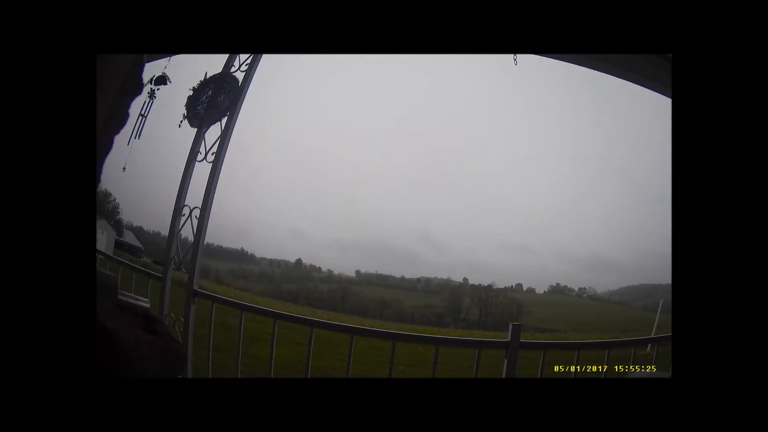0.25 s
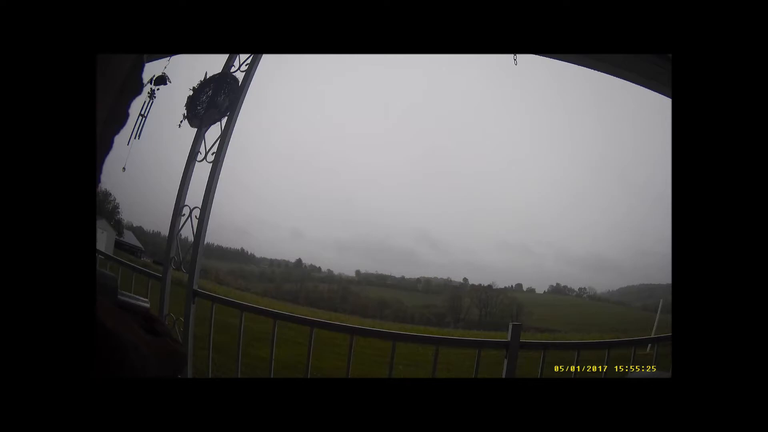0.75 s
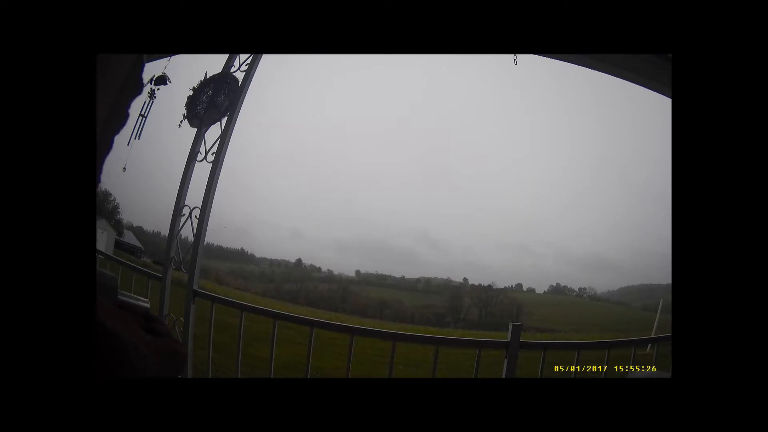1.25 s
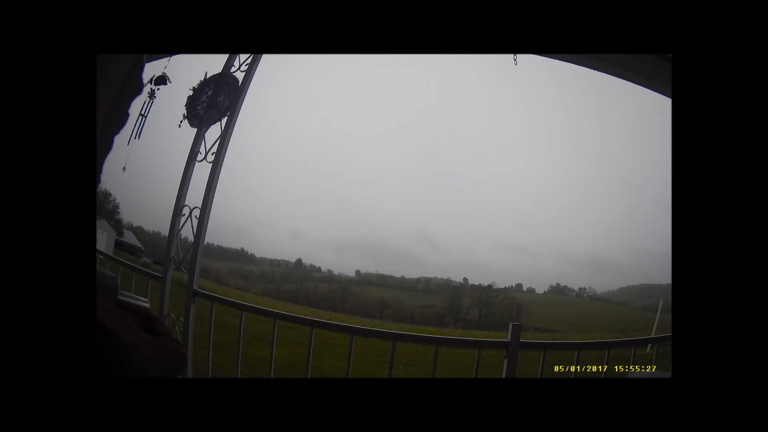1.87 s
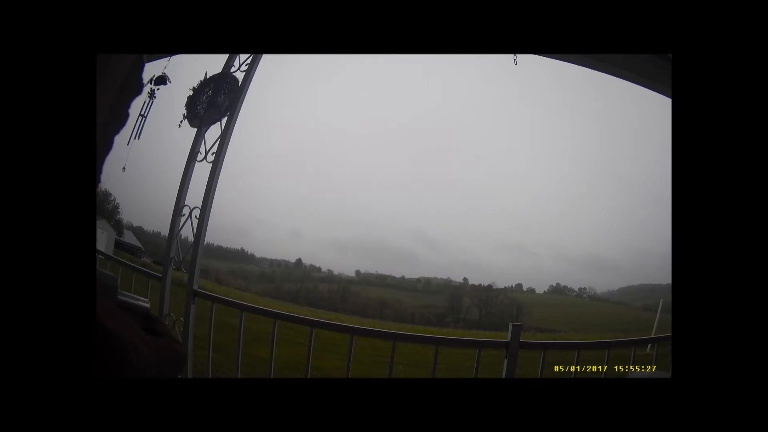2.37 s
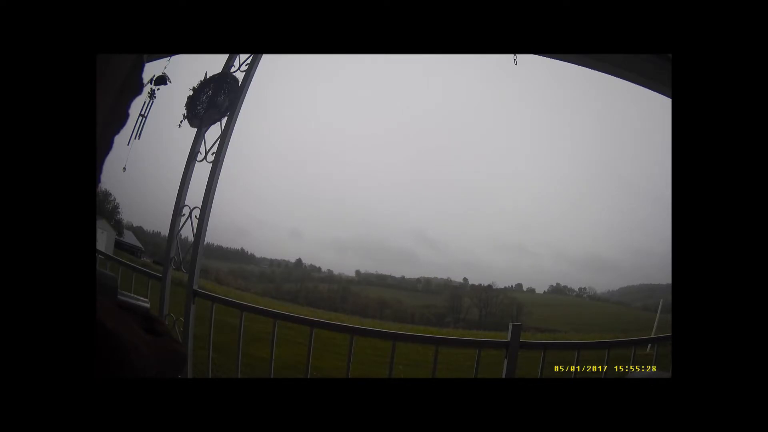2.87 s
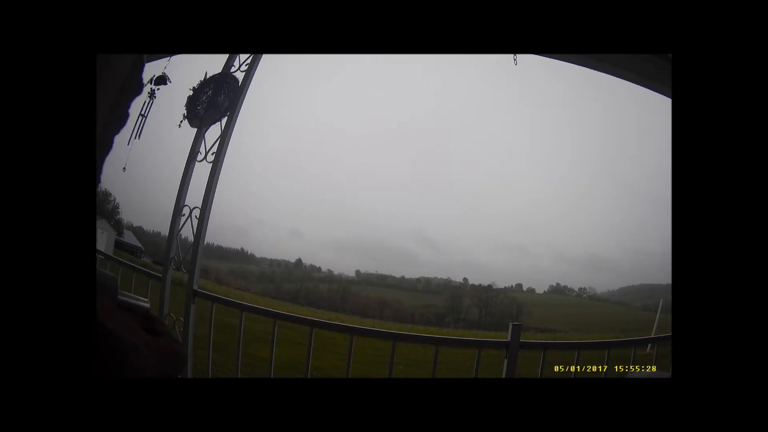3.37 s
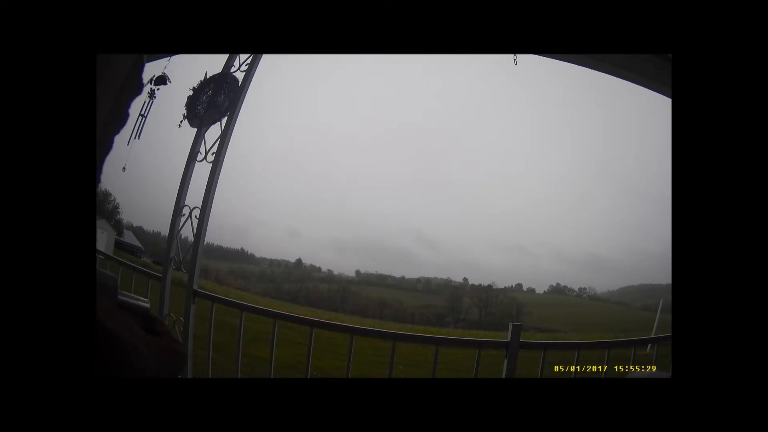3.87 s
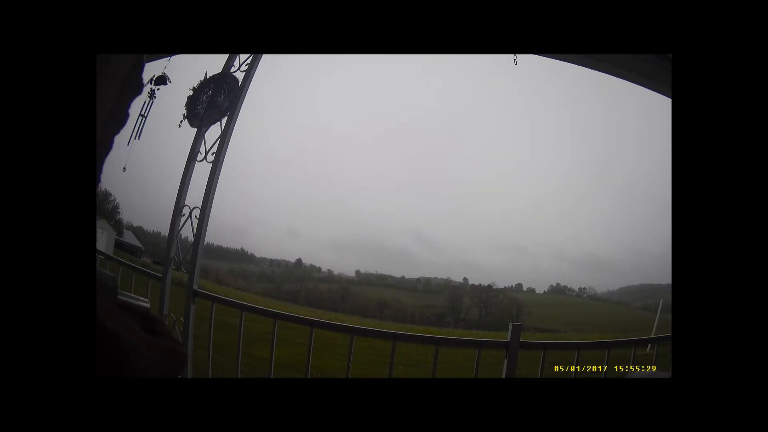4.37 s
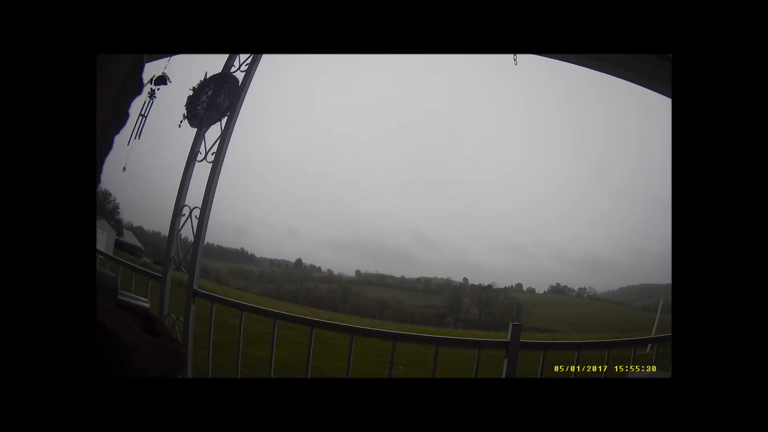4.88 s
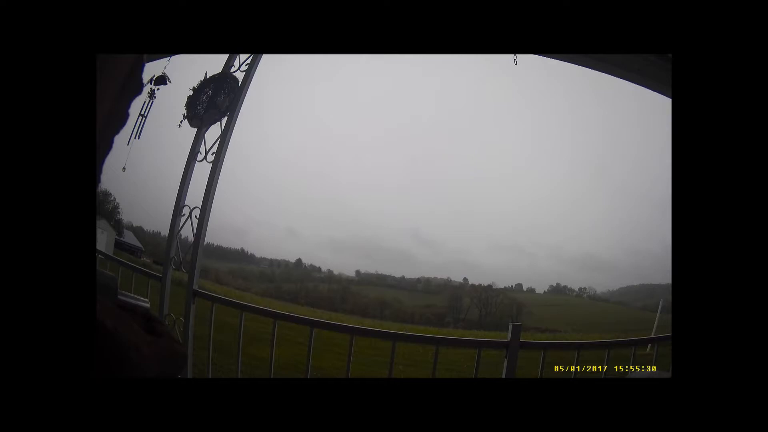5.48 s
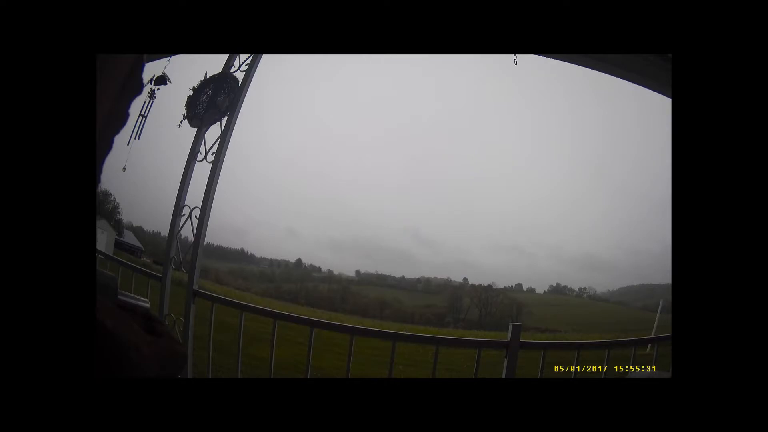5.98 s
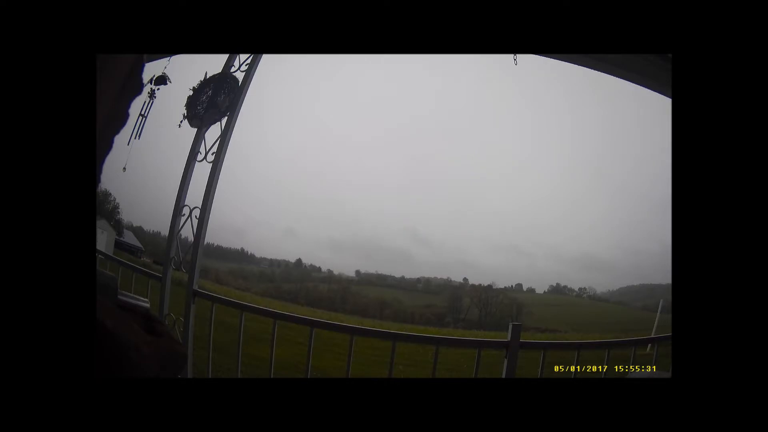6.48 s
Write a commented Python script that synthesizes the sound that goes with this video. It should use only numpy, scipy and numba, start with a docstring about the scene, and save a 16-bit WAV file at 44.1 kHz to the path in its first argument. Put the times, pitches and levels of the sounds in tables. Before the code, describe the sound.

Quiet drizzle with plinking drops is suddenly split by very loud nearby thunder, whose ragged claps crackle and boom on over the rain.

```python
"""Light rain, with plinking drops and a faint whine from the camera; then a thin snap and close thunder.
Heard from a country porch: far drops are shaped noise, near drops are splashes and brief rings.
Each kink of the lightning channel sends a small shock: they make a crackling roll, and claps where a
whole stretch arrives at once. The porch rings with them, and a bird whistles thinly near the end.
The camera's gain control ducks under the thunder and its input flattens the loudest peaks."""
import sys
import numpy as np
from scipy import signal
from scipy.fft import rfft, irfft
from scipy.io import wavfile
from scipy.ndimage import uniform_filter1d
from numba import njit

SR = 44100
rng = np.random.default_rng(int(sys.argv[2]) if len(sys.argv) > 2 else 0)


def to_wav(s):
    """Save 16-bit WAV."""
    ch = np.atleast_2d(s).T  # columns
    pcm = np.round(np.clip(ch, -1, 1) * 32767)  # PCM
    wavfile.write(sys.argv[1], SR, pcm.astype(np.int16))


N = 297234
TIME = np.arange(N) / SR
TAPS = 8192  # length of every filter response, in samples
FREQ = np.maximum(np.arange(TAPS // 2 + 1) * SR / TAPS, 1)  # Hz


def amp(db):
    """Decibels to gain."""
    return 10 ** (np.asarray(db) / 20)


def unit(x):
    """Scale to rms 1."""
    return x / np.sqrt(np.mean(x ** 2))


def line(points, at=TIME):
    """Straight lines through (seconds, value) points."""
    return np.interp(at, *np.transpose(points))


def colour(points):
    """Gain at every frequency from (Hz, dB) points, joined along log frequency."""
    hz, db = np.transpose(points)
    return amp(np.interp(np.log(FREQ), np.log(hz), db))


def below(hz, order=10):
    """Gain of a low-pass, steep by default."""
    return 1 / np.sqrt(1 + (FREQ / hz) ** order)


def above(hz, order=10):
    """Gain of a high-pass, steep by default."""
    return 1 / np.sqrt(1 + (hz / FREQ) ** order)


def response(gain):
    """Causal (minimum-phase) impulse response with this gain at each frequency."""
    cepstrum = irfft(np.log(gain + 1e-6))
    cepstrum[1:TAPS // 2] *= 2
    cepstrum[TAPS // 2 + 1:] = 0
    return irfft(np.exp(rfft(cepstrum)))


def through(x, h):
    """Filter by a response scaled to unit energy."""
    return signal.fftconvolve(x, h / np.linalg.norm(h))[:N]


def add(out, s, sound):
    """Mix a sound in at a time in seconds."""
    i = int(s * SR)
    out[i:i + len(sound)] += sound[:N - i]


def walk(rate):
    """Smooth random drift with a spread near 1, heading for a new value `rate` times a second."""
    k = int(SR / rate)
    steps = np.repeat(rng.standard_normal(N // k + 1), k)
    return 1.2 * uniform_filter1d(steps, k)[:N]


def clicks(rate, spread_db):
    """Randomly timed impulses, `rate` a second on average, of uneven size and either sign."""
    chance, size = rng.random(N), rng.standard_normal(N)
    struck = chance < rate / SR
    return unit(struck * amp(spread_db * size) * rng.choice([-1, 1], N))


def porch(wet_db, t60):
    """The direct sound, then dense reflections from roof, wall and deck that die away over t60 seconds."""
    t = TIME[:TAPS]
    tail = rng.standard_normal(TAPS) * np.exp(-np.log(1000) * t / t60) * (t > .002)
    return (t == 0) + amp(wet_db) * tail / np.linalg.norm(tail)


def scatter(x, wet_db, t60):
    """Impulses come from ever new directions, so each has its own random spray of reflections."""
    t = TIME[:TAPS]
    decay = np.exp(-2 * np.log(1000) * t / t60) * (t > .002)
    power = np.abs(signal.fftconvolve(x ** 2, decay / decay.sum())[:N])
    return x + amp(wet_db) * np.sqrt(power) * rng.standard_normal(N)


# Tone of the rain on the fields. Each row: frequency in Hz, relative level in dB per Hz.
RAIN_TONE = [(20, -21.5), (95, -2), (140, -7.5), (330, -8), (500, 0.5), (780, -6.5), (1200, -10.5),
             (1900, -9), (2900, -24.5), (4500, -29), (6200, -39), (8500, -35.5), (12000, -38)]
# Level of the whole quiet background, rain and whine alike, rising as the camera's gain comes up.
# Each row: time in seconds, reference level in dB.
BACKGROUND_LEVEL = [(0, -40.5), (.6, -42), (.98, -44.5), (1.1, -40.5), (1.4, -42.5), (2.0, -36.5),
                    (6.74, -32.5)]
# Near drips from the eaves. Each row: start in seconds, peak level in dB.
EAVES_DRIPS = [(.867, -32.5), (1.098, -38), (1.188, -35), (1.26, -38)]


def rain():
    """A noise wash of far drops, a patter of nearer splashes and a few drips from the eaves."""
    tone = colour(RAIN_TONE)
    far = through(rng.standard_normal(N), response(tone)) * amp(0.2 * walk(22))
    # near drops splash in three ranges of pitch
    patter = np.zeros(N)
    for hz, db in [(1900, -11), (4300, -27), (7000, -32)]:
        drops = scatter(clicks(rate=98, spread_db=3.5), wet_db=5.5, t60=0.099)
        band = above(hz / 1.14) * below(hz * 1.75)
        patter += amp(db) * through(drops, response(tone * band))
    out = (far + patter) * amp(line(BACKGROUND_LEVEL) - 5.5)
    drip = response(tone * above(750, order=4) * below(5000))
    for s, db in EAVES_DRIPS:
        splash = signal.fftconvolve(drip, porch(wet_db=8, t60=.1))
        add(out, s, amp(db) * splash / np.abs(splash).max())
    return out


PLINKS_PER_S, PLINK_HZ, PLINK_RING_S = 55, (3800, 9000), .0032
# least level, re the background reference, of a drop at the lowest pitch; average lift above that
PLINK_FLOOR_DB, PLINK_MEAN_LIFT_DB, PLINK_TILT_DB_PER_OCTAVE = -18, 2.15, -6


def plinks():
    """Single drops on leaves and railing, each a brief high ring at its own pitch."""
    out, t = np.zeros(N), TIME[:TAPS]
    wait, pitch, size = rng.random((500, 3)).T
    low, high = PLINK_HZ
    starts = np.cumsum(-np.log(wait)) / PLINKS_PER_S
    pitches = low * (high / low) ** pitch
    levels_db = -PLINK_MEAN_LIFT_DB * np.log(size) + PLINK_TILT_DB_PER_OCTAVE * np.log2(pitches / low)
    for s, hz, db in zip(starts, pitches, levels_db):
        if s < TIME[-1]:
            add(out, s, amp(db) * np.sin(2 * np.pi * hz * t) * np.exp(-t / PLINK_RING_S))
    return scatter(out, wet_db=-13, t60=.08) * amp(PLINK_FLOOR_DB + line(BACKGROUND_LEVEL))


WHINE_HZ, WHINE_DB = 13599, -43  # level re the background reference


def whine():
    """A faint sine of steady pitch from the camera, at a level that follows the whole background."""
    return amp(WHINE_DB + line(BACKGROUND_LEVEL)) * unit(np.sin(2 * np.pi * WHINE_HZ * TIME))


# Tone of thunder as it reaches the porch. Each row: frequency in Hz, relative level in dB per Hz.
THUNDER_TONE = [(15, -11.5), (32, 1), (60, -4.5), (110, -9), (170, -2.5), (240, -5), (420, 5), (650, 1),
                (1150, -2), (1300, -6.5), (1600, -9), (1850, -3), (2200, -5.5), (2600, -14.5),
                (4000, -31.5), (5500, -52), (9000, -64.5)]
SNAP_S = 1.4675


def snap():
    """One lone, thin shock just ahead of the strike, with its low end cut and the porch around it."""
    out = np.zeros(N)
    shock = response(colour(THUNDER_TONE) * above(860, order=3))
    sound = signal.fftconvolve(shock, porch(wet_db=3.5, t60=0.23))
    add(out, SNAP_S, amp(-7) * sound / np.abs(sound).max())
    return out


def shocks(rate, spread_db, even_s):
    """Shocks from the kinks of the channel; their power is evened out over a short stretch."""
    x = clicks(rate, spread_db)
    return x / np.sqrt(uniform_filter1d(x ** 2, int(even_s * SR)) + 1e-4)


ECHO_S, ECHO_GAIN, ECHO_DRIFT, ECHO_TURNS_PER_S = .004, 0.68, .35, 14  # drift: spread of log lag


def bounce(x):
    """Every shock returns off deck and wall, with a lag that shifts as the direction of arrival does."""
    lag = np.round(SR * ECHO_S * np.exp(ECHO_DRIFT * walk(ECHO_TURNS_PER_S))).astype(int)
    echo = x[np.maximum(np.arange(N) - lag, 0)]
    return (x + ECHO_GAIN * echo) / np.hypot(1, ECHO_GAIN)


# Claps, each a stretch of channel arriving at once. Each row: start in seconds, length in seconds,
# body level in dB, boom level in dB re body; both before the trims of the size ranges.
CLAPS_HEARD = [(1.519, .022, 0, 0.5), (1.552, 0.0073, -7, -0.5), (1.594, 0.026, -13.5, -6),
               (1.71, 0.0092, 0, 0), (1.736, .013, -7.5, -0.5), (1.793, 0.043, -1, 1.5),
               (1.883, .013, -4, 2), (2.108, 0.0036, -9.5, 4), (2.207, 0.0065, 2, -13),
               (2.37, 0.029, -4, 1.5), (2.56, 0.012, -6, 2.5), (2.833, 0.013, -9.5, 0.5),
               (3.028, 0.03, -8.5, -4), (3.042, 0.035, -8, 5.5), (3.141, 0.022, -2, 2.5),
               (3.162, 0.025, -15.5, 12), (3.361, 0.037, -8, 9.5), (3.426, .024, -10.5, 13.5),
               (3.481, 0.045, -23, 14), (3.719, 0.024, -5.5, -2), (4.006, .01, -7.5, -5.5),
               (4.101, 0.015, -16, -5), (4.146, 0.017, -3.5, -1), (4.419, 0.0039, -12, -5),
               (4.559, 0.0084, -2.5, -9.5), (4.662, 0.0053, -12, -15), (4.924, .03, -22.5, -9.5),
               (5.336, 0.0078, -16, -29), (6.47, 0.043, -15, 6)]
CLAP_FRONT_S, CLAP_OVERSHOOT, CLAP_SETTLE_S, CLAP_RELEASE_S = 0.0014, 0.66, 0.013, 0.0023


def clap_strength(levels_db):
    """Each clap sets in with a hard front, holds while its stretch of channel arrives, then dies."""
    out = np.zeros(N)
    t = TIME[:TAPS]
    onset = (1 - np.exp(-t / CLAP_FRONT_S)) * (1 + CLAP_OVERSHOOT * np.exp(-t / CLAP_SETTLE_S))
    for (s, length, *_), db in zip(CLAPS_HEARD, levels_db):
        release = np.exp(-np.maximum(t - length, 0) / CLAP_RELEASE_S)
        add(out, s, amp(db) * onset * release)
    return out


# Swells of the roll, each a crooked stretch arriving spread out. Each row: crest in seconds,
# half length in seconds, body level in dB, boom level in dB re body; both before the range trims.
ROLL_SWELLS = [(1.641, 0.025, -10.5, 1), (1.773, 0.035, -10, 2.5), (1.855, 0.024, -14, 6),
               (2.096, 0.027, -9.5, -1), (2.185, .035, -15, -8), (2.312, 0.084, -17, -22.5),
               (2.434, 0.047, -20.5, -7), (2.564, 0.033, -15.5, -16), (2.756, 0.05, -13, -10),
               (2.812, 0.028, -13.5, -7.5), (2.902, 0.039, -16, -0.5), (3.006, .035, -15, -10),
               (3.103, .025, -19.5, 2), (3.343, 0.027, -15.5, -8), (3.497, 0.14, -16.5, -1.5),
               (3.66, 0.033, -12, -3.5), (3.788, 0.055, -10.5, -8), (4.302, 0.031, -11, -5),
               (4.355, 0.043, -14.5, -14), (4.47, 0.019, -16, -3), (4.565, 0.039, -13, -8.5),
               (4.68, 0.064, -20, -24), (5.284, 0.017, -19.5, -16), (5.793, 0.04, -17.5, -2),
               (6.01, 0.038, -21.5, 0.5), (6.113, 0.022, -13.5, -3.5), (6.191, 0.031, -11, -1.5),
               (6.275, 0.042, -11.5, -5.5), (6.68, 0.012, -14.5, -24)]


def roll_strength(steady_db, levels_db):
    """Bell-shaped swells add their power to the steady roll."""
    power = amp(steady_db) ** 2
    for (s, half, *_), db in zip(ROLL_SWELLS, levels_db):
        t = np.arange(-3 * half, 3 * half, 1 / SR)
        add(power, s + t[0], amp(db) ** 2 * np.exp(-(t / half) ** 2))
    return np.sqrt(power)


# The steady roll, fading as the far channel arrives and returning off the hills.
# Each row: time in seconds, body level in dB before the range trims.
STEADY_ROLL = [(1.55, -23.5), (1.95, -20), (2.6, -23.5), (3.25, -24), (4.4, -23.5), (5.05, -28),
               (5.7, -23.5), (6.74, -23.5)]
# Treble of claps and swells; the air takes it from the far ones.
# Each row: time in seconds, level in dB re body before the range trims.
TREBLE_LEVEL = [(1.55, -6), (1.85, -5.5), (2.15, -0.5), (2.85, 0.5), (3.12, -2.5), (3.45, -4), (3.66, 0),
                (3.76, -14), (6.74, -13)]
# The roll of the deepest pressure waves. Each row: time in seconds, level in dB before the surges.
DEEP_ROLL = [(1.52, -33), (1.9, -19.5), (2.05, -31), (2.7, -42.5), (3.45, -29), (4.1, -49), (6.74, -39.5)]
# Resonances of the porch roof. Each row: frequency in Hz, width in Hz, lift in dB.
ROOF_RINGS = [(231.4, 71, 9.5), (290.5, 19, 8), (448, 35, 2), (747.5, 36, 10), (804.2, 36, 10.5),
              (895, 42, 7.5), (1110, 530, 7), (2113, 30, 6.5)]
STRIKE_S, OVERHEAD_S = 1.522, 3.1
DEEP_HZ, BOOM_HZ, CRACKLE_HZ, TEAR_HZ = 110, 550, 1400, 2900  # edges of the size ranges
BOOM_DB, BODY_DB, CRACKLE_DB, TEAR_DB = -3, -3.5, -5.5, 0  # trims of the size ranges
ROLL_BOOM_DB, ROLL_CRACKLE_DB, ROLL_DULLING_DB_PER_S = -2.5, 0.5, 1.5  # levels re body
CLAP_BOOM_DB, CLAP_TREBLE_DB, THUD_DB = -1.5, -1.5, -19.5  # offsets of the claps
SURGE_DB, SURGES_PER_S, TEAR_DULLING_DB_PER_S = 1.5, 50, 1.8


def thunder():
    """Long shocks boom, short ones crackle; the later ones come from overhead and ring the roof."""
    air = colour(THUNDER_TONE)
    roof_db = sum(db / (1 + (2 * (FREQ - hz) / width) ** 2) for hz, width, db in ROOF_RINGS)
    roof = amp(roof_db)
    overhead = np.where(TIME > OVERHEAD_S, .95, .3)
    struck = TIME > STRIKE_S
    since = TIME - STRIKE_S
    surge = amp(SURGE_DB * walk(SURGES_PER_S)) * struck
    steady_db = line(STEADY_ROLL)
    steady_crackle = ROLL_CRACKLE_DB - ROLL_DULLING_DB_PER_S * since
    swell_s, _, swell_db, swell_boom = np.transpose(ROLL_SWELLS)
    clap_s, _, clap_db, clap_boom = np.transpose(CLAPS_HEARD)
    swell_crackle = line(TREBLE_LEVEL, swell_s)
    clap_crackle = line(TREBLE_LEVEL, clap_s) + CLAP_TREBLE_DB

    def roll(strength):
        """A loose stream of shocks; each size range has its own, and all surge together."""
        return shocks(rate=1100, spread_db=3.5, even_s=0.025) * surge * strength

    def claps(levels_db):
        """Dense bunches of shocks."""
        return shocks(rate=3000, spread_db=3, even_s=.004) * struck * clap_strength(levels_db)

    def hear(arrivals, band):
        """The shocks of one size range, as they sound on the porch."""
        x = bounce(scatter(arrivals, wet_db=-7, t60=0.13))
        plain = through(x, response(air * band))
        ringing = through(x, response(air * band * roof))
        return (1 - overhead) * plain + overhead * ringing

    def voice(band, steady_tilt, swell_tilt, clap_tilt):
        """Roll, swells and claps in one size range, each some dB from its body level."""
        strength = roll_strength(steady_db + steady_tilt, swell_db + swell_tilt)
        return hear(roll(strength) + claps(clap_db + clap_tilt), band)

    boom = voice(above(DEEP_HZ) * below(BOOM_HZ), ROLL_BOOM_DB, swell_boom, clap_boom + CLAP_BOOM_DB)
    body = voice(above(BOOM_HZ) * below(CRACKLE_HZ), 0, 0, 0)
    crackle_band = above(CRACKLE_HZ) * below(TEAR_HZ)
    crackle = voice(crackle_band, steady_crackle, swell_crackle, clap_crackle)
    # the finest shocks tear like cloth and carry only a small share of the crackle's power
    share = np.linalg.norm(air * above(TEAR_HZ)) / np.linalg.norm(air * above(CRACKLE_HZ))
    tear = voice(above(TEAR_HZ), steady_crackle, swell_crackle, clap_crackle) * share
    # the air absorbs the finest shocks first
    tear = tear * amp(TEAR_DB - TEAR_DULLING_DB_PER_S * since)
    # the boomiest claps hold the longest shocks and land as a low thud
    thud = hear(claps(clap_db + 2 * clap_boom + THUD_DB), above(DEEP_HZ) * below(352))
    # the earliest claps shake the deepest air most
    thump_db = np.interp(clap_s, [1.9, 2.1, 3.5, 3.7], [-12.0, -41, -24, -28])
    deep_arrivals = roll(amp(line(DEEP_ROLL))) + claps(clap_db + clap_boom + thump_db)
    deep = hear(deep_arrivals, below(DEEP_HZ))
    return amp(BOOM_DB) * boom + amp(BODY_DB) * body + amp(CRACKLE_DB) * crackle + tear + thud + deep


# One thin whistle of a far bird. Each row: time in seconds, pitch in Hz, level in dB.
BIRD_WHISTLE = [(6.321, 5700, -67), (6.335, 5370, -58), (6.355, 4700, -61), (6.39, 4520, -43),
                (6.43, 4700, -62), (6.46, 4560, -65)]


def bird():
    """A falling sine whistle, blurred by a fast random flutter of its pitch."""
    s, hz, db = np.transpose(BIRD_WHISTLE)
    pitch = np.interp(TIME, s, hz) * (1 + .013 * walk(400))
    whistle = np.sin(2 * np.pi * np.cumsum(pitch) / SR)
    singing = (TIME > s[0]) & (TIME < s[-1])
    return whistle * amp(np.interp(TIME, s, db)) * singing


def scene():
    """Rain, its plinks and the camera's whine, the first snap, the thunder, and a bird near the end."""
    return (rain() + plinks() + whine() + snap() + thunder() + bird())[None]


@njit
def follow(x, attack, release):
    """Envelope that rises quickly and sinks slowly."""
    out, e = np.empty(len(x)), 0.
    for i in range(len(x)):
        e += (x[i] - e) * (attack if x[i] > e else release)
        out[i] = e
    return out


TOP_HZ = 15600


def record(dry, attack_s=.025, release_s=0.38, threshold_db=-5, knee=14):
    """The camera: gain control too slow for the claps, an input that flattens peaks, and a cut top."""
    envelope = follow(np.abs(dry[0]), 1 / (attack_s * SR), 1 / (release_s * SR))
    x = dry / np.maximum(envelope / amp(threshold_db), 1)
    # clean up to the knee, then rounded off into full scale
    excess = np.maximum(np.abs(x) - (1 - 1 / knee), 0)
    x = x - np.sign(x) * (excess - np.tanh(knee * excess) / knee)
    low_pass = signal.ellip(10, .1, 85, TOP_HZ, fs=SR, output="sos")
    return signal.sosfilt(low_pass, x)


dry = scene()
out = record(dry)
to_wav(out)
```